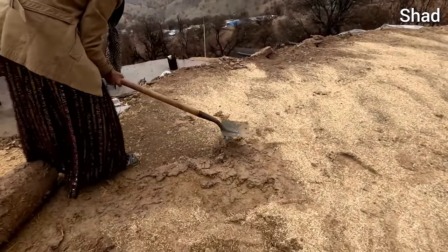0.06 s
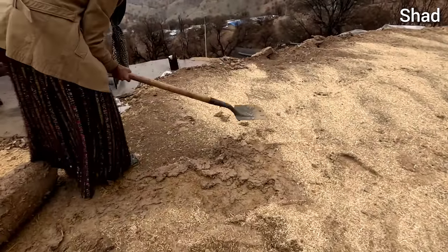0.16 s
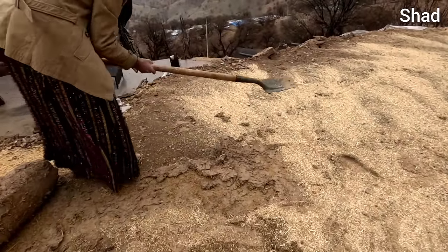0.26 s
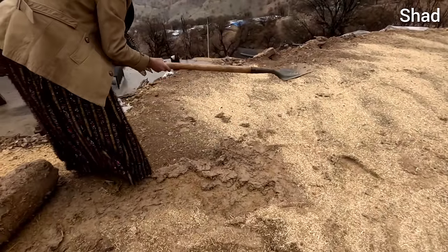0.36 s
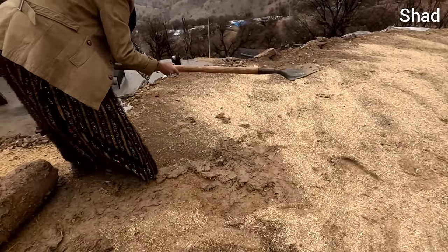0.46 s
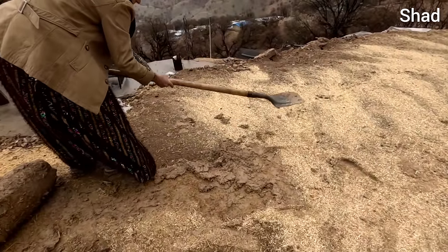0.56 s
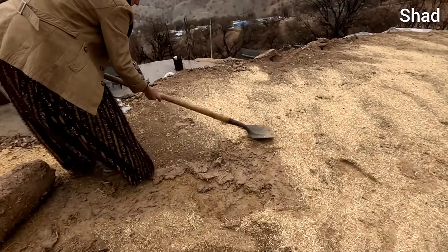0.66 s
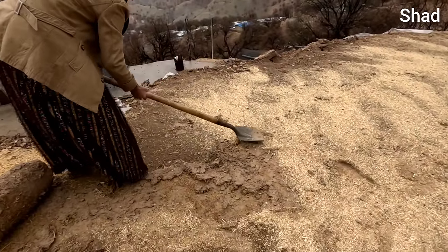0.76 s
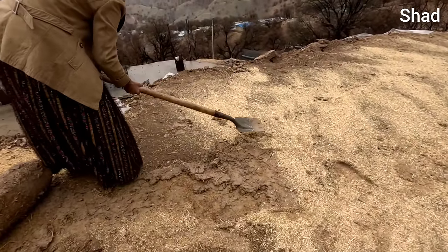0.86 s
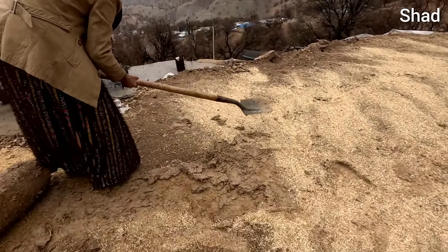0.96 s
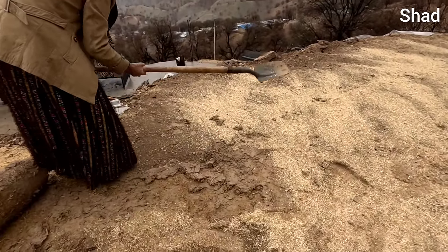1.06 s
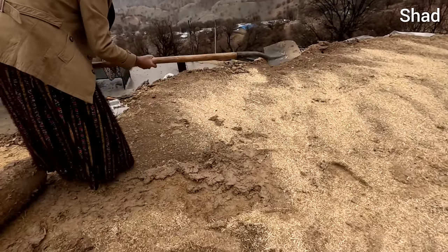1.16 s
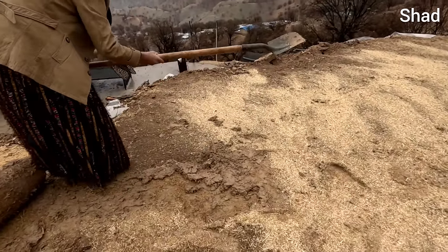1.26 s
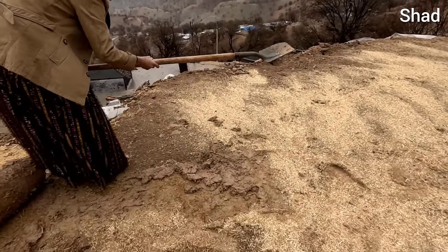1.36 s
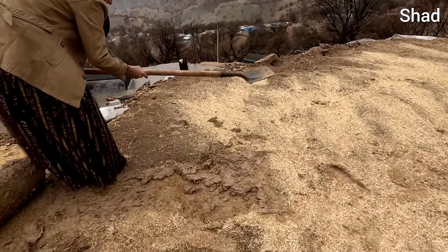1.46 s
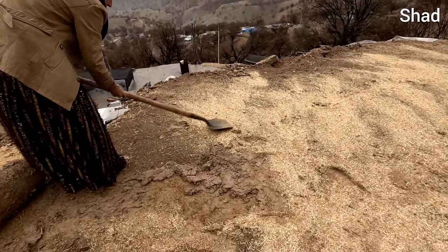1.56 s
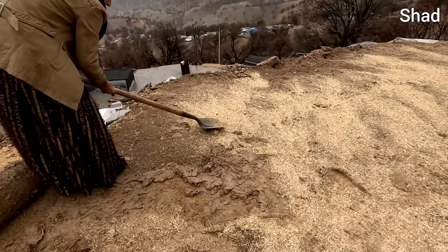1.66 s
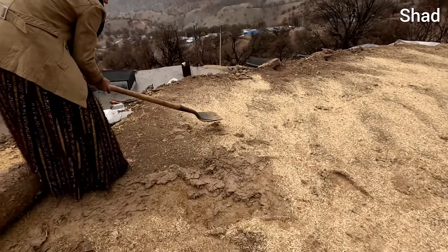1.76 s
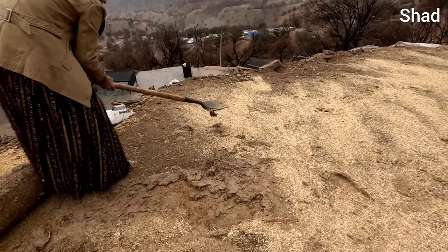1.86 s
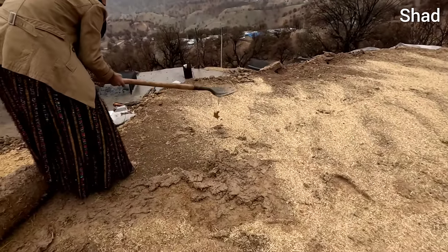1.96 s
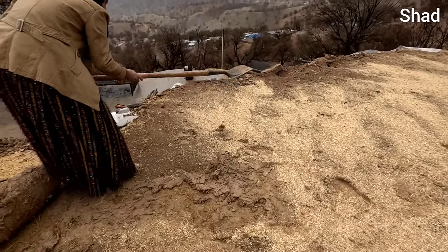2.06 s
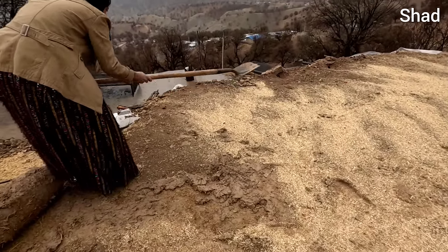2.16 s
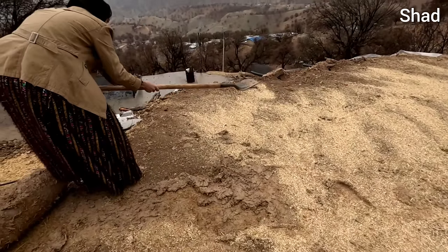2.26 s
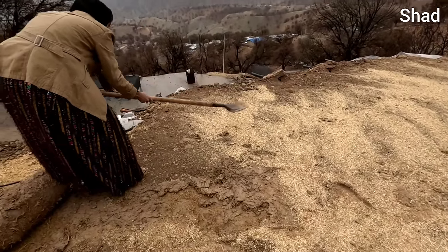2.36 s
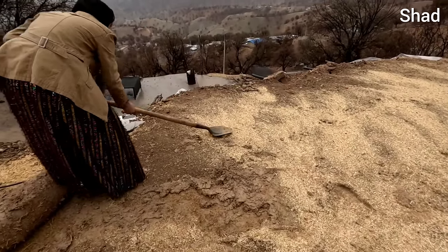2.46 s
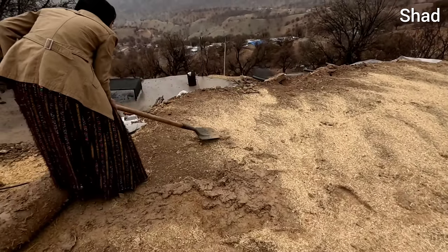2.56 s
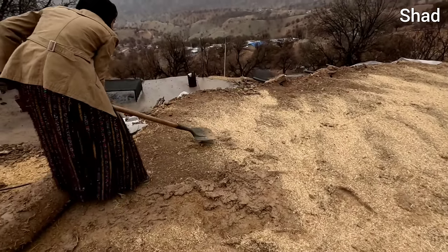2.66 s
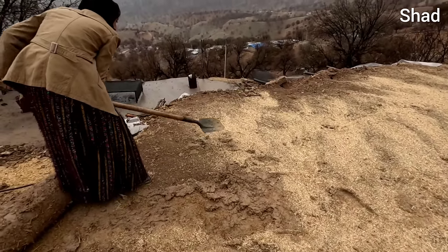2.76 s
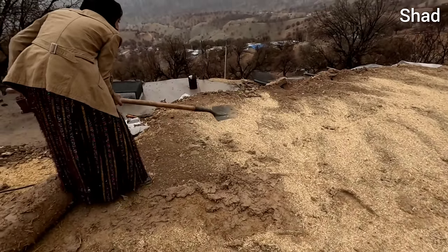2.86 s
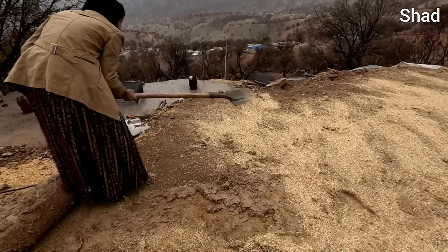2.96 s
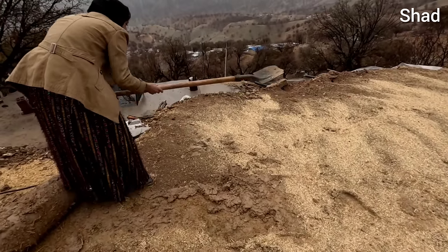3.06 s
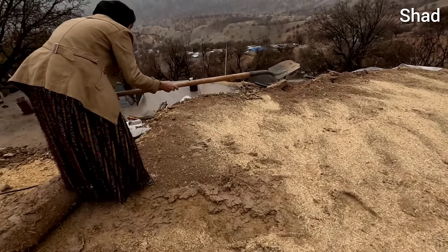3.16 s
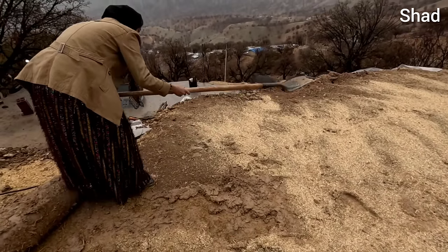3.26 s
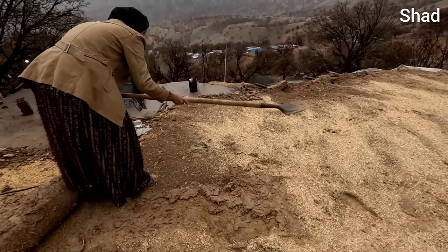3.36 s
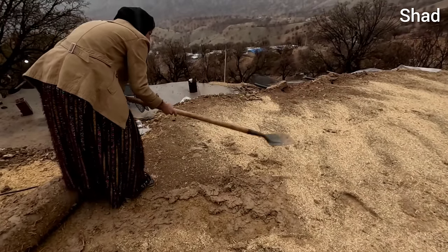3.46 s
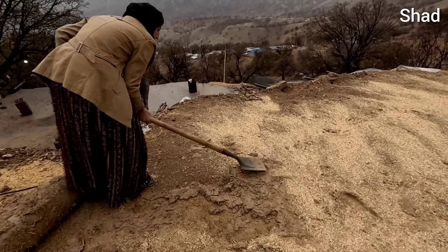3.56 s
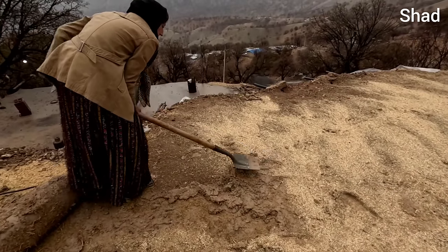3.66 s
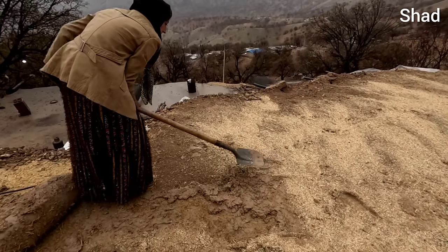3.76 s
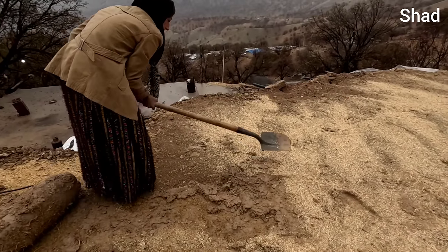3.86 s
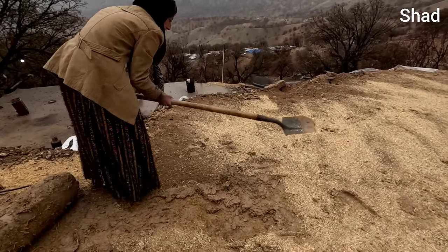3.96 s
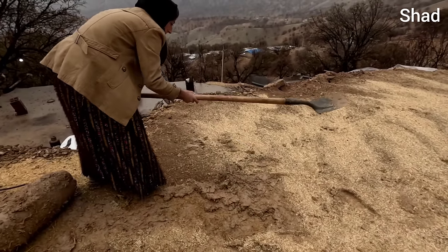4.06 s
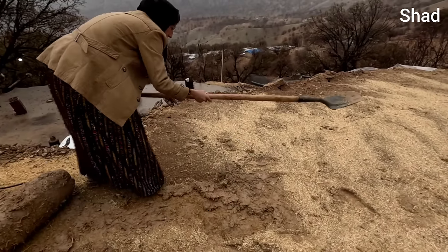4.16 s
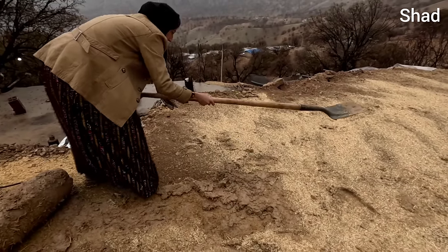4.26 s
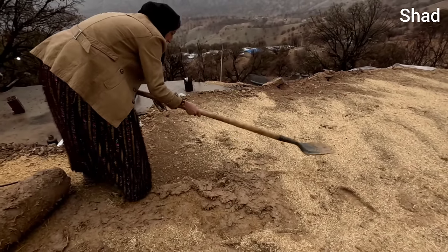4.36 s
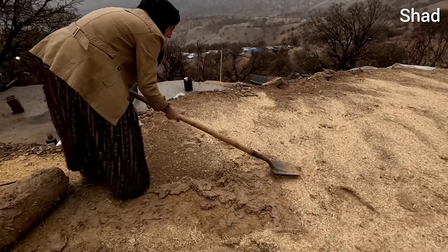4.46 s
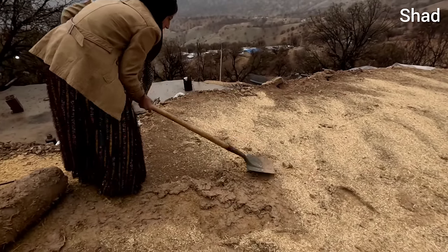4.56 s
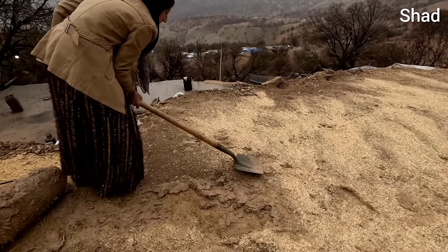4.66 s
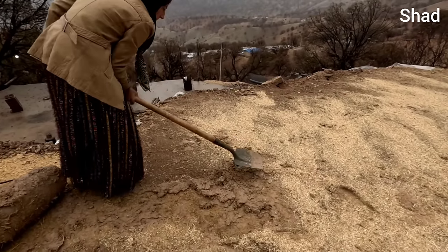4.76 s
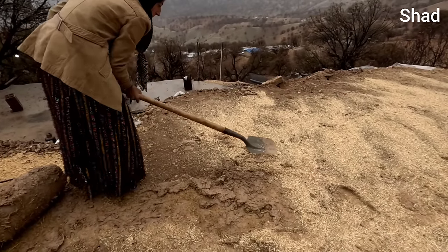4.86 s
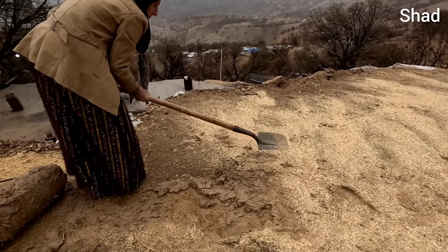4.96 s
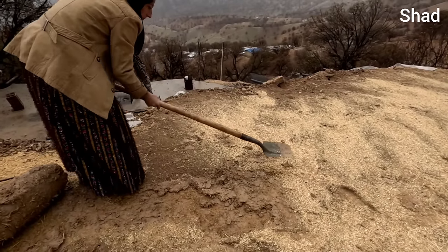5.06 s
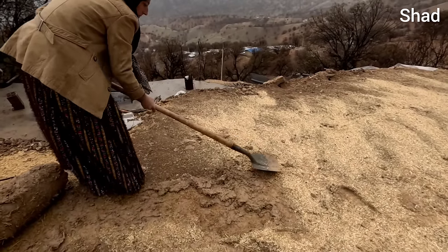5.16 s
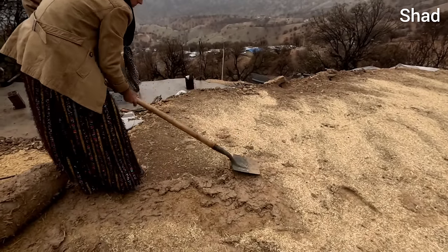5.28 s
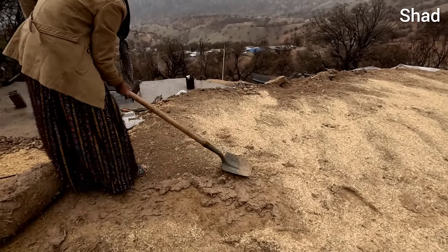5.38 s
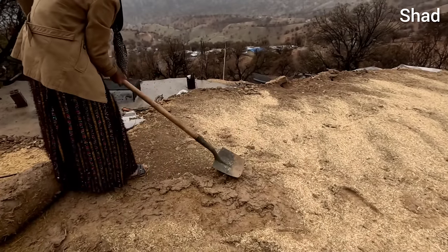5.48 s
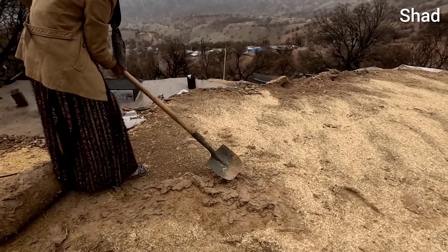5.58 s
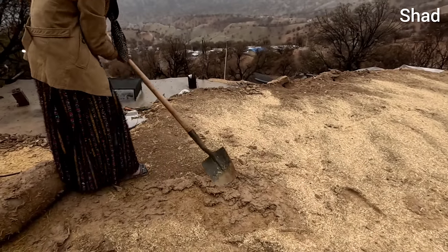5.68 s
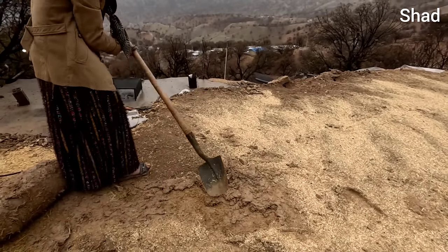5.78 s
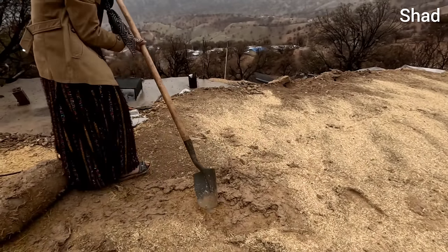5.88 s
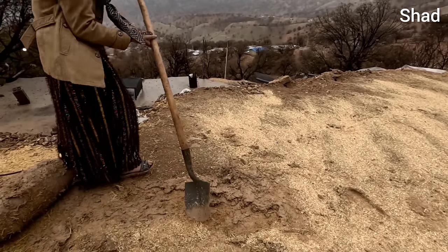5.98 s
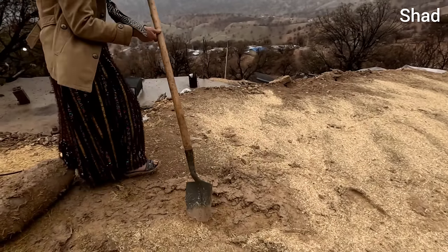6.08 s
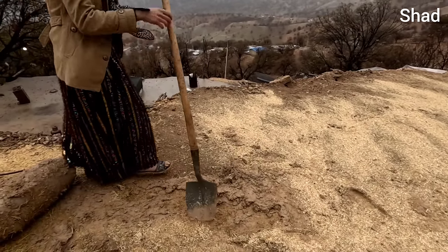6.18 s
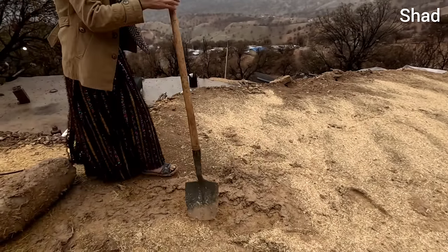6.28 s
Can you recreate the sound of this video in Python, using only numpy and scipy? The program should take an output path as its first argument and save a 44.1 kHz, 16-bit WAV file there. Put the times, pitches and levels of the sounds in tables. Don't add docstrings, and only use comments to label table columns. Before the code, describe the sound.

Outdoors, a steel shovel chops six times into straw-covered mud with dull thuds and crisp cracks, while chaff rustles and a dog yaps far off.

```python
import sys
import numpy as np
from scipy import signal
from scipy.fft import rfft, irfft, next_fast_len
from scipy.io import wavfile
from scipy.ndimage import map_coordinates

SR = 44100
rng = np.random.default_rng(int(sys.argv[2]) if len(sys.argv) > 2 else 0)


def attenuation_scalar(level_db):
    decades = np.asarray(level_db, float) / 20
    return 10 ** decades


def log_audio(samples):
    frames = np.atleast_2d(samples).T
    limited = np.clip(frames, -1, 1)
    pcm = np.round(limited * 32767).astype(np.int16)
    wavfile.write(sys.argv[1], SR, pcm)


N = 278852

# start_s, hold_s, deep_soil_db, hollow_ground_db, port_jolt_db
TREADS = [
    (0, 0.0079, -64, -71, -56),
    (0.779, 0.055, -59, -66, -52.5),
    (1.712, 0.066, -56.5, -67.5, -52.5),
    (1.931, 0.13, -63.5, -81, -53.5),
    (2.598, 0.043, -64, -67.5, -62),
    (3.621, 0.1, -68, -56.5, -49),
    (4.594, 0.1, -62, -63.5, -59.5),
    (5.286, 0.016, -60, -68, -59),
    (6.075, 0.025, -59, -52.5, -57.5),
    (6.307, .01, -74, -82, -62),
]
TREAD_RISE_S, TREAD_FALL_S = 0.021, 0.062
# pitch_hz, level_db (per Hz)
DRONE = [(53, -63), (90, -43), (107, -39), (130, -10.5), (183, -3), (339, -13), (450, -41), (580, -61),
         (990, -120)]


def unit(x):
    return x / np.sqrt(np.mean(x ** 2) + 1e-20)


def along(points, hz):
    point_hz, value = np.transpose(points)
    return np.interp(np.log(hz + 1), np.log(point_hz + 1), value)


def curves(rows):
    s, *columns = np.transpose(rows)
    return [np.interp(np.arange(N) / SR, s, column) for column in columns]


def wobble(rate):
    knots = rng.standard_normal(int(N * rate / SR) + 4)
    return map_coordinates(knots, [np.arange(N) * rate / SR])


def filtered(x, response):
    size = next_fast_len(N + 8192)
    hz = np.fft.rfftfreq(size, 1 / SR)
    return irfft(rfft(x, size) * response(hz), size)[..., :N]


def noise(spectrum, grain=1):
    white = grain * rng.standard_normal((2, N))
    return unit(filtered(white, lambda hz: attenuation_scalar(along(spectrum, hz))))


def swells(rows, level_db, rise_s, fall_s):
    grid_s = np.arange(0, N / SR + .002, .001)
    t, hold = grid_s - np.array(rows)[:, :1], np.array(rows)[:, 1:2]
    down = np.maximum(-t / rise_s, 0) + np.maximum((t - hold) / fall_s, 0)
    power = np.sum(attenuation_scalar(2 * (level_db[:, None] - 10 * down)), axis=0)
    return np.interp(np.arange(N) / SR, grid_s, np.sqrt(power))


def ports(pair, alike, tilt):
    # pitch_hz, lead_rad
    phase_lead = [(45, 0), (86, .3), (130, .9), (170, 1.14), (400, 1.4), (2000, 1.2), (4000, 1.35),
                  (8000, 2), (10000, 2.9), (14000, 4.5)]

    def mix(sign):
        def response(hz):
            turn = np.arccos(np.clip(along(alike, hz), 0, 1)) / 2
            tilt_db = along(tilt, hz)
            lean = attenuation_scalar(sign * tilt_db / 2) * np.exp(-.5j * sign * along(phase_lead, hz))
            level = lean / np.cosh(tilt_db * np.log(10) / 40)
            return level * np.array([np.cos(turn), sign * np.sin(turn)])
        return filtered(pair, response).sum(axis=0)
    return np.array([mix(0.95), mix(-1.1)])


def scuff():
    # time_s, level_db
    rustle = [(0, -70), (.3, -75), (.6, -74.5), (1.2, -72.5), (1.7, -71), (2, -74), (2.8, -70),
              (3.2, -71.5), (4.1, -72.5), (4.5, -70.5), (5.2, -71.5), (6.32, -68)]
    # start_s, hold_s, level_db, treble_db
    scuffs = [
        (0, 0.055, -55.5, -10.5),
        (0.779, .02, -53.5, -13),
        (1.68, 0.023, -53, -6),
        (2.56, 0.035, -63, -18),
        (2.635, 0.072, -65, -16),
        (3.65, 0.086, -64.5, -8.5),
        (4.548, 0.056, -60.5, -15),
        (4.659, 0.032, -64, 2),
        (5.29, 0.014, -53, -4),
        (6.067, 0.022, -53, -8),
    ]
    # start_s, hold_s, level_db, treble_db
    drags = [
        (2.53, .01, -66, -16),
        (3.78, 0.016, -67, -5),
        (4.29, 0.027, -68.5, 1),
        (5.04, 0.034, -66, 4),
        (5.412, 0.03, -58, -6),
        (5.475, 0.022, -62.5, -12),
        (5.91, 0.026, -66.5, 3),
    ]
    # pitch_hz, level_db (per Hz)
    chaff_colour = [(180, -16), (300, -9.5), (620, -13), (751, -13), (921, -13), (1140, -6), (2060, -3),
                    (4500, -13), (5850, -29), (9900, -120)]
    fizz_colour = [(2060, -13.5), (3500, 1.5), (3660, -5), (7480, -9), (8210, -13.5), (12100, -22),
                   (14700, -28), (15500, -34)]
    soil_colour = [(40, -18), (65, 8.5), (100, -16), (130, 0.5), (250, -50.5)]
    bed = attenuation_scalar(curves(rustle)[0] + 1.27 * wobble(7))
    body, top = bed, bed * attenuation_scalar(-2.5)
    for rows, rise_s, fall_s in (scuffs, 0.0071, 0.035), (drags, 0.037, 0.042):
        level_db, treble_db = np.transpose(rows)[2:]
        body = np.hypot(body, swells(rows, level_db, rise_s, fall_s))
        top = np.hypot(top, swells(rows, level_db + treble_db, rise_s, fall_s))
    grain = attenuation_scalar(1.2 * wobble(80) + 3.2 * wobble(900))
    chaff = body * noise(chaff_colour, grain) + top * noise(fizz_colour, grain)
    soil_db, hollow_db = np.transpose(TREADS)[2:4]
    soil = attenuation_scalar(-92) + swells(TREADS, soil_db, TREAD_RISE_S, TREAD_FALL_S)
    hollow = swells(TREADS, hollow_db, TREAD_RISE_S, TREAD_FALL_S)
    deep = soil * attenuation_scalar(2.5 * wobble(6.7)) * noise(soil_colour)
    return chaff + deep + hollow * attenuation_scalar(3 * wobble(21)) * noise(DRONE)


def valley():
    # time_s, buffet_db
    wind = [(0, -66.5), (.45, -63), (.7, -75.5), (1, -61.5), (1.5, -66), (2.2, -62.5), (2.45, -57.5),
            (2.75, -65), (3.05, -62.5), (3.4, -62.5), (3.95, -67), (4.4, -63), (4.9, -61), (5.35, -62.5),
            (5.6, -70.5), (5.85, -64), (6.32, -70)]
    # time_s, drone_db
    machine = [(0, -80.5), (1.5, -78), (2.7, -72.5), (3.5, -77), (3.95, -72), (5.3, -73.5), (6.05, -69.5),
               (6.32, -74)]
    # pitch_hz, level_db (per Hz)
    air_colour = [(190, -15), (330, -7), (420, -3.5), (738, -8), (1040, -0.5), (1320, 0.5), (3250, -5),
                  (5530, -7), (8270, -21.5), (10000, -17.5), (13600, -37), (15500, -53)]
    buffet_colour = [(8.8, -20), (15, 12), (34, -20), (46, -11.5), (70, -57), (110, -61), (140, -90),
                     (240, -120)]
    (buffet_db,), (drone_db,) = curves(wind), curves(machine)
    jolt = swells(TREADS, np.transpose(TREADS)[-1], TREAD_RISE_S, TREAD_FALL_S)
    buffet = np.hypot(attenuation_scalar(buffet_db), jolt)
    lumps = attenuation_scalar(2 * wobble(9))
    hiss = attenuation_scalar(-70 + .7 * wobble(3)) * noise(air_colour)
    core_hz = 188 * (1 + 0.065 * wobble(20))
    core = np.sin(2 * np.pi * np.cumsum(core_hz) / SR) * attenuation_scalar(4.5 * wobble(14))
    late = np.clip((np.arange(N) / SR - 3.6) / 0.14, .2, 1)
    drone = attenuation_scalar(drone_db - 1) * (attenuation_scalar(2 * wobble(21)) * noise(DRONE) + late * core * [[1], [0]])
    pressure = filtered(noise(buffet_colour), lambda hz: hz ** 2 / (hz ** 2 + 22 ** 2))
    return hiss + drone + attenuation_scalar(9) * buffet * unit(lumps * pressure)


def cracks():
    # start_s, peak_db, centre_hz, t60_s, treble_db
    cuts = [(0.776, -18.5, 1273, .032, -18.5), (0.781, -29, 1060, 0.02, -4.5), (0.805, -45, 1580, 0.11, -9),
            (1.674, -21.5, 1485, 0.03, -13), (1.676, -14, 855, 0.015, -16.5),
            (2.549, -27.5, 2480, 0.026, -32), (2.551, -21.5, 2660, 0.02, -47),
            (2.574, -39.5, 1100, 0.07, -7.5), (3.627, -27, 1110, 0.027, -10),
            (3.6303, -18, 2100, 0.016, -7), (3.64, -28, 2380, 0.04, -16),
            (4.5353, -28.5, 1400, 0.047, -8.5), (4.544, -31, 2080, 0.074, -32),
            (6.075, -29.5, 1550, 0.039, -13.5), (6.085, -31, 1600, 0.032, -13.5)]
    # start_s, peak_db, centre_hz, treble_db
    ticks = [(0.115, -41, 1110, -33), (0.523, -52.5, 3330, -2), (0.676, -47, 1398, -19),
             (0.966, -50, 1130, -9), (1.303, -52.5, 1740, -5), (1.4, -47.5, 3180, -21),
             (1.449, -69, 1460, -15), (1.856, -49.5, 1410, -23), (1.9, -42.5, 1360, -13),
             (2.167, -48, 1450, -9), (2.329, -47.5, 1540, -5), (2.542, -42, 1850, -35),
             (2.649, -46, 1250, -28), (2.845, -47.5, 1670, -12), (3.012, -48.5, 1130, -13),
             (3.038, -49.5, 2150, -21), (3.406, -48, 1300, -8), (3.593, -47.5, 1300, -25),
             (3.82, -47, 1041, -21), (4.017, -44, 1110, -22), (4.101, -50, 1160, -30),
             (4.453, -44.5, 1070, -26), (4.474, -45, 900, -44), (4.773, -48, 5500, -3.5),
             (4.821, -53, 1500, -3), (4.93, -49, 2762, -19), (5.578, -48, 1530, -20),
             (5.714, -48, 1370, -26), (6.24, -57, 3200, -11)]
    # start_s, peak_db, centre_hz, treble_db
    crumbs = [(1.689, -43, 1820, -6), (1.697, -38, 2630, -8), (1.704, -46, 1240, -18),
              (1.724, -37.5, 1500, -23), (2.562, -34.5, 1900, -15), (2.586, -40.5, 1770, -23),
              (2.608, -50, 1870, -19), (2.642, -40, 1750, -17), (2.686, -53, 1320, -25),
              (3.654, -46.5, 1230, 2), (3.678, -50, 1250, -14), (4.562, -35, 1380, -7),
              (4.572, -37, 1280, -29), (4.59, -39, 1140, -27), (4.614, -47, 1280, -8),
              (4.664, -44, 1790, -8), (4.679, -55, 2500, -14), (5.286, -48.5, 1300, -7),
              (6.103, -42.5, 2150, -4), (6.115, -47, 1460, -12)]
    # pitch_hz, level_db (per Hz)
    snap_colour = [(240, -26), (400, -10.5), (694, -10.5), (1360, -0.5), (1610, -4.5), (2220, -8),
                   (2840, -7), (4560, -22), (8670, -32), (10600, -62), (15500, -58)]
    spray_colour = [(2500, -25), (4000, 0), (7000, -9), (8500, -21.5), (10500, -13), (12000, -38),
                    (14000, -42.5), (15700, -64)]
    ring, broad, spray = np.zeros((3, 2, N + SR))
    t = np.arange(SR // 12) / SR
    high = signal.butter(2, 4000, "high", fs=SR, output="sos")
    contacts = [(*row, -6.5) for row in cuts]
    for rows, t60, ring_db in (crumbs, 0.043, -4), (ticks, 0.019, -4.5):
        contacts += [(s, db, hz, t60, treble_db, ring_db) for s, db, hz, treble_db in rows]
    for s, db, hz, t60, treble_db, ring_db in contacts:
        burst = attenuation_scalar(db - 60 * t / np.clip(t60, .004, .1)) * (1 - np.exp(-t / 0.00076))
        grit = rng.standard_normal((3, 2, len(t)))
        band = signal.butter(1, [hz * 0.955, hz * 1.024], "band", fs=SR, output="sos")
        narrow = unit(signal.sosfilt(band, grit[0]))
        start = round(s * SR)
        at = slice(start, start + len(t))
        ring[:, at] += burst * attenuation_scalar(ring_db) * narrow * (1 - np.exp(-t / 0.0008))
        broad[:, at] += burst * grit[1] / (1 + attenuation_scalar(2 * ring_db))
        spray[:, at] += burst * attenuation_scalar(treble_db - 60 * t / 0.44) * signal.sosfilt(high, grit[2])

    def coloured(x, colour):
        return filtered(x[:, :N], lambda hz: attenuation_scalar(along(colour, hz)) / (1 + (hz / 13000) ** 12))
    return ring[:, :N] + attenuation_scalar(12) * coloured(broad, snap_colour) + attenuation_scalar(11) * coloured(spray, spray_colour)


def thuds():
    # start_s, thud_peak_db, thud_pitch_hz, blade_knock_db, ground_shake_db
    blows = [
        (.782, -29.5, 147, -35, -11.5),
        (1.6811, -18, 182, -33, -14),
        (2.5523, -18, 190, -20, -16.5),
        (3.634, -11.5, 167.6, -8, -20),
        (4.5398, -17.5, 240, -32, -13),
        (6.089, -36, 202, -8, -12),
    ]
    out, t = np.zeros(N + SR), np.arange(SR // 3) / SR
    band = signal.butter(2, [60, 330], "band", fs=SR, output="sos")
    lead = .012
    since = t - lead
    after = np.clip(since, 0, 1)
    for s, db, hz, knock_db, shake_db in blows:
        u = since * hz / 0.44
        bell = np.exp(-u * u / 2)
        swell = np.where(u < 0, bell, bell * 0.91 + 0.28 * np.exp(-.4 * np.abs(u)))
        push = swell * np.cos(2 * np.pi * hz * since)
        knock = attenuation_scalar(knock_db) * np.exp(-u * u / 3) * np.cos(2 * np.pi * 330 * (since - .0006))
        shake = np.cos(2 * np.pi * 98 * after) * attenuation_scalar(shake_db - 60 * after / 0.23)
        shake *= 1 - np.exp(-after / 0.02)
        rubble = unit(signal.sosfilt(band, rng.standard_normal(len(t))))
        rubble *= attenuation_scalar(-24 - 60 * after / 0.22) * (after > 0)
        out[round((s - lead) * SR):][:len(t)] += attenuation_scalar(db) * (push + knock + shake + rubble)
    return np.array([out[:N], 0 * out[:N]])


def pops():
    # start_s, level_db, pitch_hz, swell_ms, pitch_rise (0-1)
    pockets = [(0.827, -40.5, 1550, 2, 0.06), (1.689, -38, 2200, 1.5, 0.01), (1.72, -58, 2630, 2.4, 0),
               (2.5505, -49, 2700, 1.5, 0), (2.561, -34, 1720, 1.9, 0.08), (3.642, -26, 1870, 2.3, 0.22),
               (4.386, -45.5, 1270, 1.2, 0.15), (4.3973, -36, 3100, 0.25, 0.03),
               (2.908, -38, 1640, 0.27, 0), (4.590, -50, 1150, 2.7, 0.16), (1.7255, -40, 970, 1.6, 0.12),
               (1.675, -30.5, 610, 1.7, 0), (.776, -42.5, 593, 4.2, 0.04), (6.087, -40, 1490, 2, 0)]
    out, t = np.zeros((2, N + SR)), np.arange(SR // 20) / SR
    for s, db, hz, ms, rise in pockets:
        u = t / (ms / 1000)
        turn = 2 * np.pi * np.cumsum(hz * (1 + rise * np.tanh(u))) / SR
        out[0, round(s * SR):][:len(t)] += attenuation_scalar(db) * u * np.exp(1 - u) * np.sin(turn)
    return out[:, :N]


def yaps():
    # start_s, length_s, pitch_hz, glide_hz_per_s, level_db
    calls = [
        (0.819, .095, 445, 152.5, -57.5),
        (1.547, 0.062, 481, 650, -59.5),
        (1.58, .085, 433, -200, -55.5),
        (3.736, 0.068, 513, 1, -60.5),
    ]
    # pitch_hz, level_db
    throat = [(300, -18), (450, -2.5), (900, -7.5), (1320, -0.5), (1800, -15.5), (2400, -28)]
    out = np.zeros(N)
    for s, length, pitch_hz, glide, level_db in calls:
        t = np.arange(N) / SR - s
        arch = np.clip(2 * t / length - 1, -1, 1)
        hz = pitch_hz + glide * arch * length / 2
        db = level_db - 16 * arch ** 2
        gate = np.clip(np.minimum(t, length - t) / .015, 0, 1)
        turn = 2 * np.pi * np.cumsum(hz * (1 + .02 * wobble(200))) / SR
        voice = np.zeros(N)
        for k in range(1, 6):
            voice += attenuation_scalar(along(throat, k * hz) + 3 * wobble(90)) * np.sin(k * turn + k * k)
        breath = noise([(200, -40), *throat, (4000, -50)])[0]
        out += gate * attenuation_scalar(db + 3) * (voice + .45 * breath)
    echo_s = np.arange(SR // 8) / SR
    tail = rng.standard_normal(SR // 8) * attenuation_scalar(-60 * echo_s / .12)
    out += .4 * signal.fftconvolve(out, tail / np.linalg.norm(tail))[:N]
    return np.array([out, 0 * out])


def pings():
    # start_s, level_db, upper_tone_db
    hits = [
        (1.698, -48, 0),
        (1.727, -50, -2),
        (2.588, -60, 6),
        (2.644, -53.5, 6),
        (4.564, -39, -7),
        (6.087, -57, -2),
        (6.115, -45.5, -28),
    ]
    # pitch_hz, t60_s
    steel = [(7000, 0.028), (10000, 0.019)]
    out, t = np.zeros((2, N + SR)), np.arange(SR // 12) / SR
    for s, db, upper_db in hits:
        modes = np.zeros(len(t))
        for (hz, t60), gain_db in zip(steel, (0, upper_db)):
            modes += attenuation_scalar(gain_db - 60 * t / t60) * np.sin(2 * np.pi * hz * t)
        out[0, round(s * SR):][:len(t)] += attenuation_scalar(db) * modes * (1 - np.exp(-t / 0.00057))
    return out[:, :N]


def scene():
    # pitch_hz, likeness (0-1)
    near_alike = [(60, 0.24), (300, 0.78), (3000, 1), (5000, 0.81), (9000, 1), (14000, 0.17)]
    far_alike = [(60, 0.62), (150, 1), (400, 0.82), (900, 0.79), (3000, 0.46), (5000, 0.096),
                 (12000, 0.079)]
    # pitch_hz, difference_db
    near_tilt = [(60, 8), (110, 5), (200, 0), (380, -3.5), (700, -2), (1290, 1), (2380, 3.5), (4400, 8.5),
                 (8120, 12), (10000, 17), (12500, 4), (15000, 3)]
    far_tilt = [(60, 1), (110, -1), (200, -4), (380, -6), (700, -4.5), (1290, 0.5), (2380, 3.5), (4400, 9),
                (8120, 15.5), (15000, 13)]
    far = ports(scuff() + valley(), far_alike, far_tilt)
    near = ports(cracks() + thuds() + pops() + yaps() + pings(), near_alike, near_tilt)
    return near + far


def low_pass(x):
    return signal.sosfilt(signal.butter(12, 15780, fs=SR, output="sos"), x)


def record(dry):
    limited = filtered(dry, lambda hz: hz < 15780)
    return low_pass(limited)


dry = scene()
out = record(dry)
log_audio(out)
```